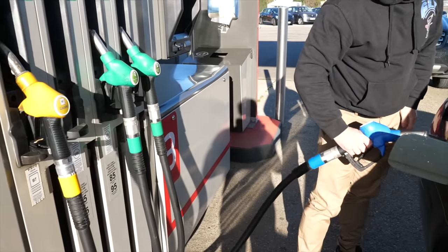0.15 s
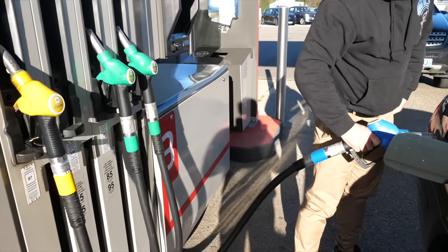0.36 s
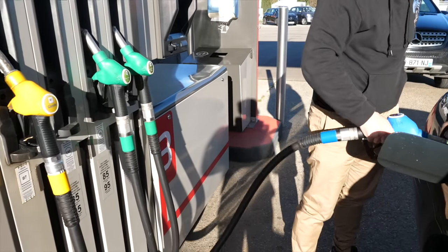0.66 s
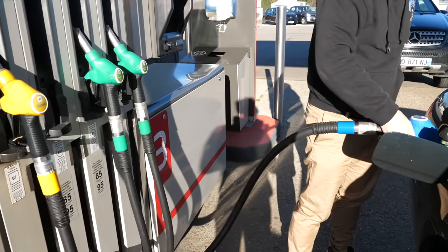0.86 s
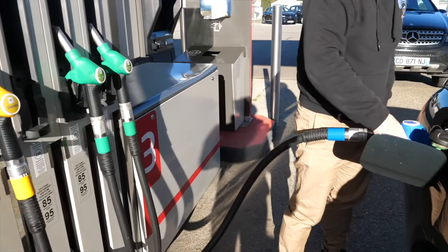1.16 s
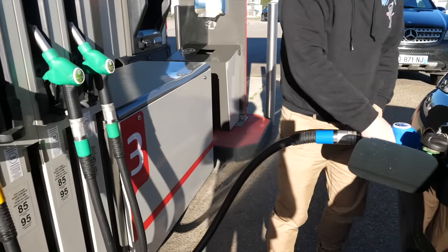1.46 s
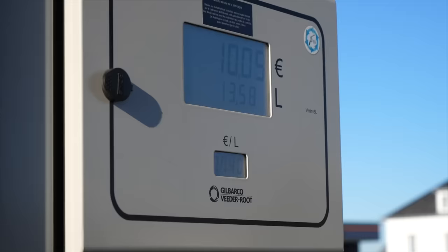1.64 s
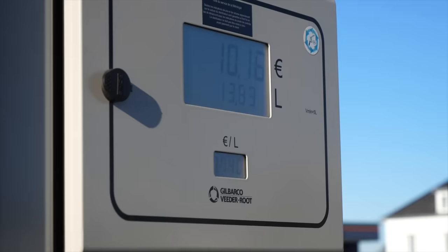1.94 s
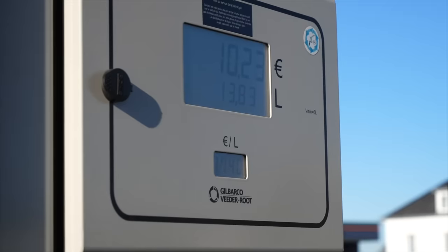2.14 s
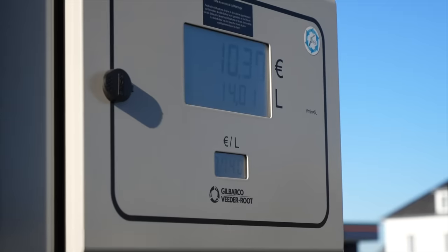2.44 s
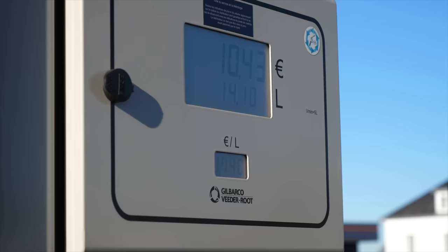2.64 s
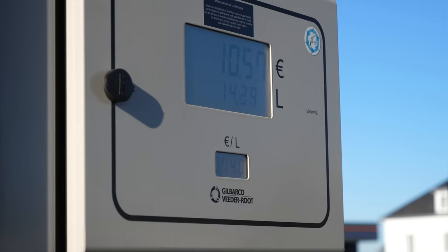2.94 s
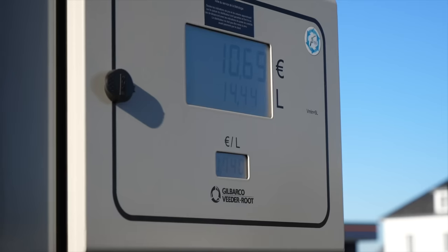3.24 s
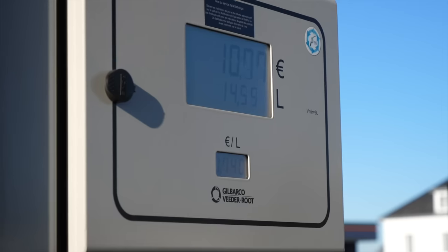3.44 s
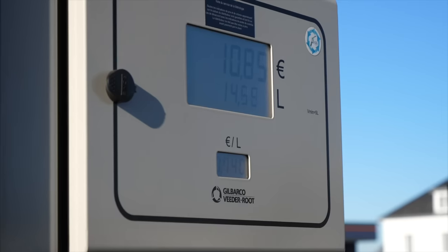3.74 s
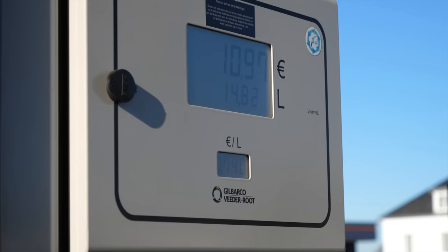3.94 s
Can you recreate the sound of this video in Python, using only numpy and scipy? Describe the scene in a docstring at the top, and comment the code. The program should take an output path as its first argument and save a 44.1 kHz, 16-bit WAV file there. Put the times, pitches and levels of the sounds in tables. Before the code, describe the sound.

A metal nozzle taps and knocks into a car's filler pipe amid traffic noise, then a fuel dispenser drones with rushing fuel.

```python
"""A filling station. First, over rumbling traffic and droning machines, a nozzle taps a car's filler neck
(the pipe to the tank), clunks home just before 1 s, and its trigger clicks. At 1.6 s comes a short silence.
From 1.9 s we are close to the dispenser: an electric motor drives a vane pump, the steel cabinet buzzes
and fuel rushes over a low hum."""
import sys
import numpy as np
from scipy import signal
from scipy.fft import rfft, irfft
from scipy.io import wavfile
from scipy.ndimage import map_coordinates

SR = 44100
rng = np.random.default_rng(int(sys.argv[2]) if len(sys.argv) > 2 else 0)


def pcm_store(signal):
    """Save signal as 16-bit PCM."""
    levels = np.round(np.clip(np.atleast_2d(signal), -1, 1) * 32767)
    wavfile.write(sys.argv[1], SR, levels.astype(np.int16).T)


N = 180622
T = np.arange(N) / SR
HZ = np.fft.rfftfreq(N, 1 / SR)


# the motor's main tones: multiple of its speed, level/dB
MOTOR_TONES = [(3, -38.9), (4, -45.2), (5, -52), (7, -45.8), (8, -53.5), (9, -44.3), (10, -52.5),
               (12, -54.5), (13, -49.3), (14, -54), (16, -48), (18, -45.8), (20, -50.5), (45, -51.3)]
# the pump's main tones: multiple of its speed, level/dB
PUMP_TONES = [(10, -53), (12, -50.5), (14, -51), (18, -52.5), (20, -53), (30, -53), (40, -50.5), (46, -52),
              (51, -51), (60, -43.8), (70, -52.5), (75, -53), (80, -50.5), (97, -49.5), (111, -55.5),
              (121, -53), (122, -50), (123, -50), (125, -53), (133, -57.5), (140, -58.5), (158, -56),
              (177, -50.8), (179, -53), (180, -56), (198, -53.5), (199, -57.5), (245, -57), (258, -59.5)]
# tone colour of fuel rushing inside the cabinet: f/Hz, level/dB
FLOW_COLOUR = [(100, -21), (180, -3), (420, -2.5), (900, -0.5), (1300, -3.5), (2000, -8.5), (4200, -15),
               (4600, -16.5), (7000, -20.5), (8800, -26.5), (10500, -28), (12500, -31.5), (15500, -41)]
# pitches at which the cabinet's panels ring: f/Hz, width/Hz, boost/dB
PANEL_RINGS = [(560, 120, 1.5), (900, 100, 2), (1610, 170, 5), (1820, 60, 2.5), (2160, 150, 4),
               (2325, 70, 6.5), (2590, 60, 4), (2720, 100, 2), (3190, 50, 3), (3350, 880, 5.5),
               (3740, 40, 6), (4160, 190, 5), (5610, 170, 5), (5840, 64, 4.5), (6800, 400, 1)]

def dispenser(motor_hz=48.296, pump_hz=13.024, vanes=10):
    """Motor and vane pump buzz through the cabinet; the fuel rushes in step with them."""
    motor, pump = shaft(motor_hz, wobble=0.00077), shaft(pump_hz, wobble=0.000717)
    # the motor's deepest tone is nearly steady; those above it flutter with the load
    deepest, *upper = MOTOR_TONES
    whine = tones(motor, [deepest], flutter_db=0.5) + tones(motor, upper, flutter_db=1.8)
    whine += tones(pump, PUMP_TONES, flutter_db=2)
    motor_colour = [(100, 0), (900, 2), (2000, 3), (5000, 12), (15000, -21)]
    pump_colour = [(100, 0), (800, 1), (3000, -2.5), (6000, -7), (15000, 3)]
    motor_buzz = colour(rattle(motor, motor_hz, MOTOR_TONES), motor_colour)
    pump_buzz = colour(rattle(pump, pump_hz, PUMP_TONES), pump_colour)
    # the flow pulses with the motor's strongest tone, with each passing vane and once a pump turn
    surge = (1 + 0.041 * np.cos(2 * np.pi * 3 * motor)
             + 0.017 * np.cos(2 * np.pi * vanes * pump)
             + 0.011 * np.cos(2 * np.pi * pump))
    rush = noise() * surge * amp(0.66 * drift(46))  # swirling makes the fuel churn
    inside = rush + amp(-12.5) * motor_buzz + amp(-4.5) * pump_buzz
    return whine + amp(-31.5) * colour(inside, FLOW_COLOUR, PANEL_RINGS)


def shaft(hz, wobble):
    """Counts the turns of a shaft whose speed wavers with the load."""
    return np.cumsum(hz * (1 + wobble * drift(4.05))) / SR


def tones(turns, multiples, flutter_db):
    """Tones at multiples of a shaft's speed, each fluttering in its own time."""
    flutter = np.sqrt(2) * unit(amp(flutter_db * drift(6.7)))
    return sum(amp(db) * np.roll(flutter, rng.integers(N)) * np.sin(2 * np.pi * (k * turns + rng.random()))
               for k, db in multiples)


def rattle(turns, hz, main_tones, spread_db=1):
    """The same rough surfaces meet on every turn: a buzz that fills in between the main tones."""
    k = np.arange(round(SR / hz / 2))
    partials = amp(spread_db * rng.standard_normal(len(k))) * np.exp(2j * np.pi * rng.random(len(k)))
    taken = np.isin(k, [multiple for multiple, db in main_tones])
    one_turn = irfft(partials * ~taken)
    return map_coordinates(one_turn, [(turns % 1) * len(one_turn)], order=3, mode="grid-wrap")


# the spout's blows in the neck: t/s, level/dB, contact f/Hz, treble tilt/(dB per octave), thump/dB
SPOUT_BLOWS = [(.5325, -23.5, 800, 0, -16), (.5375, -21.5, 1250, -5, -12), (.5925, -18, 1050, 0, -12),
               (.9045, -13.5, 1550, -2, -10), (.9072, -10.5, 640, -8, -3), (.9098, -11.5, 1300, -8, -4),
               (.916, -12.5, 460, -9, -9), (.921, -16.5, 850, -4, -10), (.9352, -14, 1650, 2, -14),
               (.9425, -21.5, 420, 0, -8), (.948, -10.3, 1200, -3, -22)]
# tone colour of the neck's thud: f/Hz, level/dB
THUD_COLOUR = [(30, -50), (150, -28), (300, -8.5), (480, -3), (1000, 4.5), (1650, -4), (2100, -6),
               (3500, -9.5), (5500, -17.5), (7500, -31), (15000, -45)]
# the neck's ringing tones: f/Hz, level/dB, fade time/s
NECK_RINGS = [(382, -7, .12), (474, 1, .17), (662, -3, .15), (734, -4, .17), (850, -6, .2), (1010, -1, .2),
              (1185, -3, .17), (1305, 1, .17), (1420, 0, .06), (1573, 1, .15), (1720, -6, .14)]
# tone colour of the thump of the car's body: f/Hz, level/dB
THUMP_COLOUR = [(120, -29), (240, -15), (340, -5), (480, -6.5), (1000, -42), (4000, -80)]

def knocks(contact_fade_s=.028, thud_fade_s=.075, hollow_fade_s=.56, thump_fade_s=.1):
    """Each blow of the spout is a hard contact and a thud that ring the neck and thump the car's body."""
    t, out = np.arange(SR // 3) / SR, np.zeros(N)
    for s, db, contact_hz, tilt, thump_db in SPOUT_BLOWS:
        tilted = [(hz, level + tilt * np.log2(1 + hz / 1000)) for hz, level in THUD_COLOUR]
        contact = fade(t, contact_fade_s, db=-1) * np.sin(2 * np.pi * contact_hz * t)
        thud = burst(tilted, fade(t, thud_fade_s) + fade(t, hollow_fade_s, db=-19))
        thump = burst(THUMP_COLOUR, fade(t, thump_fade_s, thump_db))
        blow = contact + amp(-10) * (thud + thump) + amp(-8) * ring(NECK_RINGS, t)
        add(out, s, amp(db) * blow * onset(t, rise_s=.000075))
    # so small a pipe gives off no deep bass
    return signal.sosfilt(signal.butter(2, 150, "high", fs=SR, output="sos"), out)


# clicks of nozzle and trigger: t/s, level/dB, brightest f/Hz, crack's fade time/s, ring/dB, snap/dB
NOZZLE_CLICKS = [(.5922, -18, 5100, 0.024, -18, -2.5), (.7678, -23.5, 4960, .045, -5, 5),
                 (.9046, -21.5, 5540, 0.04, -12, 2.5), (.9205, -23.5, 5430, 0.046, -14, -6),
                 (0.9353, -22, 4020, .032, -19, 5.5), (.942, -23, 5300, .03, -11, -1),
                 (1.2008, -29.5, 3600, .04, -1, -4), (1.211, -32, 3580, .044, -10, -3),
                 (1.5665, -17, 4150, 0.032, -15, 7)]
# ringing tones of the nozzle's steel: f/Hz, level/dB, fade time/s
STEEL_RINGS = [(3340, -7, 0.07), (3600, -1.5, 0.1), (4120, -8, 0.05), (4840, -3, 0.11), (5130, -4, 0.14),
               (5540, -16, .12), (5700, -17, 0.2)]

def clicks(snap_fade_s=.005, echo_fade_s=.2, reach_hz=600):
    """Steel meets steel: a snap, a bright crack, a thin ring and a faint echo from the station's roof."""
    t, out = np.arange(SR // 4) / SR, np.zeros(N)
    crack_colour = [(100, -53), (2000, -7), (3300, -8.5), (5500, -4), (7500, -10.5), (15000, -19)]
    for s, db, hz, fade_s, ring_db, snap_db in NOZZLE_CLICKS:
        snap = amp(snap_db) * ring([(hz, 0, snap_fade_s)], t)
        crack = colour(rng.standard_normal(len(t)), crack_colour, [(hz, 900, 11)])
        crack *= fade(t, fade_s) + fade(t, echo_fade_s, db=-23)
        # where the nozzle is struck decides which of its tones ring most
        struck = [(f, level - 10 * np.log10(1 + ((f - hz) / reach_hz) ** 2), ring_s)
                  for f, level, ring_s in STEEL_RINGS]
        click = snap + 0.37 * crack + amp(ring_db) * ring(struck, t)
        add(out, s, amp(db) * click * onset(t, rise_s=.00024))
    return out


# the spout's ringing tones: f/Hz, level/dB, fade time/s
SPOUT_RINGS = [(1588, 0, .065), (1830, -7, .05), (2850, -15, .08), (3530, -8.5, .08), (4880, -10, .03),
               (5400, -10, .03), (6885, -20, .06)]

def spout_tap(at_s=.5925):
    """The spout, still free, strikes the rim of the neck and rings like a short tube."""
    t, out = np.arange(SR // 4) / SR, np.zeros(N)
    add(out, at_s, amp(-17) * ring(SPOUT_RINGS, t) * onset(t, rise_s=.0003))
    return out


# humming tones beside the dispenser: f/Hz, width/Hz, level/dB
HUM_TONES = [(77.1, 3.5, -56.5), (116.4, 0.94, -48.5)]
# tone colour of the rumble there: f/Hz, level/dB
RUMBLE_COLOUR = [(20, -33), (40, -31), (52, 2), (90, -1), (125, 4), (180, -2), (260, -7), (600, -67),
                 (2000, -80)]

def low_hum():
    """A wavering hum and a low rumble beside the dispenser."""
    hum = sum(amp(db) * wavering(hz, width, flutter_db=.7) for hz, width, db in HUM_TONES)
    return hum + amp(-44.5) * colour(noise(), RUMBLE_COLOUR)


# tone colour of the traffic: f/Hz, level/dB
TRAFFIC_COLOUR = [(15, -82.5), (25, -44.5), (43, -26.5), (62, -23.5), (96, -22.5), (115, -9.5), (175, -6.5),
                  (285, -7), (350, -8.5), (425, -8.5), (495, -13), (703, -12.5), (945, -13), (1200, -16.5),
                  (2170, -18), (15500, -46.5)]

def traffic(swell_at_s=.37, swell_width_s=.39, split_hz=1200):
    """The rumble of traffic swells once and settles; its flickering hiss follows a little."""
    swell_db = 3.5 * np.exp(-((T - swell_at_s) / swell_width_s) ** 2)
    bumps = [(535, 190, 2), (2250, 110, 1.4), (3750, 1800, 4.3), (5800, 2100, 3.8)]
    spectrum = rfft(colour(noise(), TRAFFIC_COLOUR, bumps))
    low_share = 1 / (1 + (HZ / split_hz) ** 8)
    rumble = unit(irfft(spectrum * low_share, N)) * amp(-33 + swell_db)
    hiss = unit(irfft(spectrum * (1 - low_share), N)) * amp(-40 + 0.093 * swell_db + 1.1 * drift(25))
    return rumble + hiss


# droning tones of far machines: f/Hz, width/Hz, starting level/dB, growth/(dB per s)
DRONE_TONES = [(164.5, 4.7, -38.5, -2), (184.2, 7.8, -42, -4.5), (235.3, 21, -43, -6.5),
               (316.4, 8.5, -43.5, 0.5), (378, 5.3, -37.5, -13), (403.7, 5.8, -51.5, 4),
               (630, 6, -43, -7.5), (770, 14, -55.5, 4.5), (847, 16, -51, 2.5), (935, 47, -39.5, -6.5)]
# a far whine: starting f/Hz, climb/(Hz per s), width/Hz, starting level/dB, growth/(dB per s)
RISING_WHINE = (468.5, 30.5, 18.5, -53, 10)

def machinery():
    """Far machines: a hum, a drone whose tones grow or fade, and a whine that climbs and gets louder."""
    hum = amp(-49.5) * wavering(hz=75.7, width=1.2, flutter_db=2)
    drone = sum(amp(db + growth * T) * wavering(hz, width, flutter_db=1.5)
                for hz, width, db, growth in DRONE_TONES)
    hz, climb, width, db, growth = RISING_WHINE
    whine = amp(db + growth * T) * wavering(hz + climb * T, width, flutter_db=3.5)
    return hum + drone + whine


def amp(db):
    """Turns decibels into a number to multiply by."""
    return 10 ** (np.asarray(db) / 20)


def unit(x):
    """Scales a sound to an average strength (rms) of 1."""
    return x / np.sqrt(np.mean(abs(x) ** 2) + 1e-20)


def colour(x, points, bumps=()):
    """Shapes a sound by a curve (f/Hz, level/dB) and bumps (f/Hz, width/Hz, boost/dB); strength 1."""
    hz = np.fft.rfftfreq(len(x), 1 / SR)
    f, level = np.transpose(points)
    curve_db = np.interp(np.log(hz + 1), np.log(f + 1), level)
    boost_db = sum(db / (1 + (2 * (hz - centre) / width) ** 2) for centre, width, db in bumps)
    return unit(irfft(rfft(x) * amp(curve_db + boost_db), len(x)))


def noise():
    """White noise for the whole scene."""
    return rng.standard_normal(N)


def drift(hz):
    """A random wander of strength 1, mostly slower than hz."""
    return unit(irfft(rfft(noise()) * (HZ > 0) / (1 + (HZ / hz) ** 2), N))


def wavering(hz, width, flutter_db):
    """A tone that wanders in loudness, and in pitch over about width Hz."""
    turns = np.cumsum(hz + width / 2 * drift(width)) / SR
    return unit(amp(flutter_db * drift(width)) * np.sin(2 * np.pi * (turns + rng.random())))


def onset(t, rise_s):
    """Climbs from 0 to 1 at the start of a blow."""
    return 1 - np.exp(-t / rise_s)


def fade(t, fade_s, db=0):
    """Starts at db and drops 60 dB in each fade time."""
    return amp(db - 60 * t / fade_s)


def ring(rings, t):
    """Tones dying away after one blow; peak 1."""
    out = sum(fade(t, fade_s, db) * np.sin(2 * np.pi * (hz * t + rng.random())) for hz, db, fade_s in rings)
    return out / abs(out).max()


def burst(points, envelope):
    """Coloured noise that follows a loudness curve, always with that curve's energy."""
    shaped = colour(rng.standard_normal(len(envelope)), points) * envelope
    return unit(shaped) * np.sqrt(np.mean(envelope ** 2))


def add(mix, s, sound):
    """Mixes a sound in at s seconds."""
    part = mix[round(s * SR):][:len(sound)]
    part += sound[:len(part)]


def scene(car_end_s=1.627, dispenser_start_s=1.894):
    """First by the car, then by the dispenser; the same in both ears."""
    by_car = traffic() + machinery() + knocks() + spout_tap() + clicks()
    by_dispenser = dispenser() + low_hum()
    car_on = np.clip((car_end_s - T) / .001, 0, 1)
    dispenser_on = np.clip((T - dispenser_start_s) / .001, 0, 1)
    mix = car_on * by_car + dispenser_on * by_dispenser
    return np.array([mix, mix])


def record(dry, top_hz=15650):
    """Takes away the very highest treble."""
    low_pass = signal.firwin(511, top_hz, window=("kaiser", 9), fs=SR)
    return signal.oaconvolve(dry, low_pass[None], "same")


dry = scene()
out = record(dry)
pcm_store(out)
```